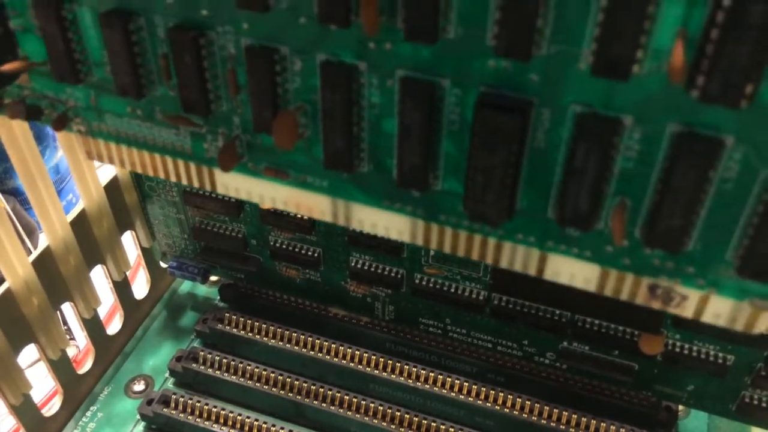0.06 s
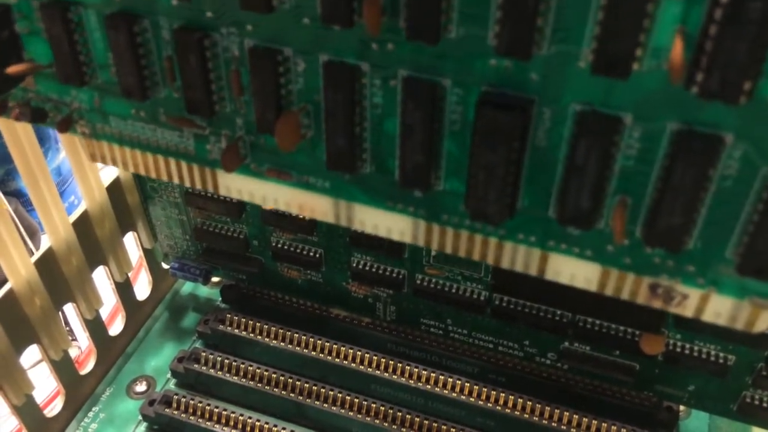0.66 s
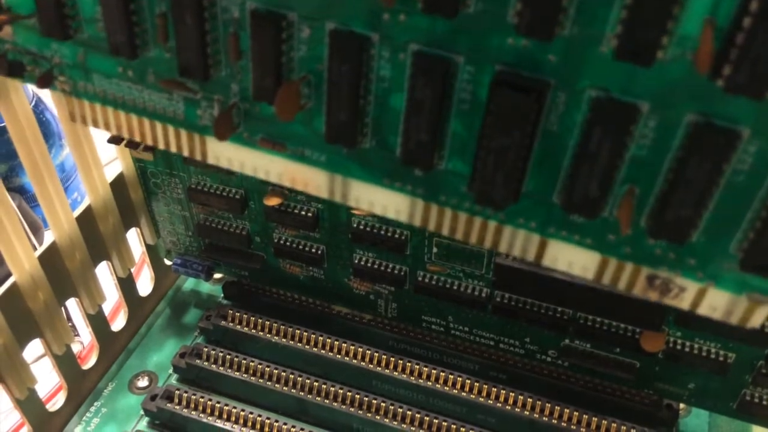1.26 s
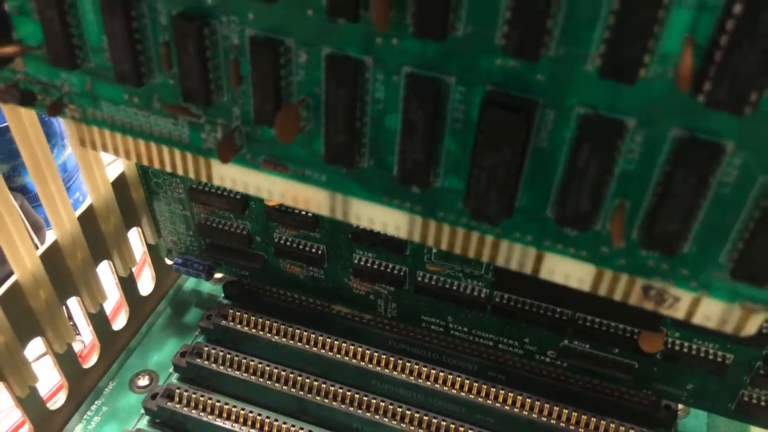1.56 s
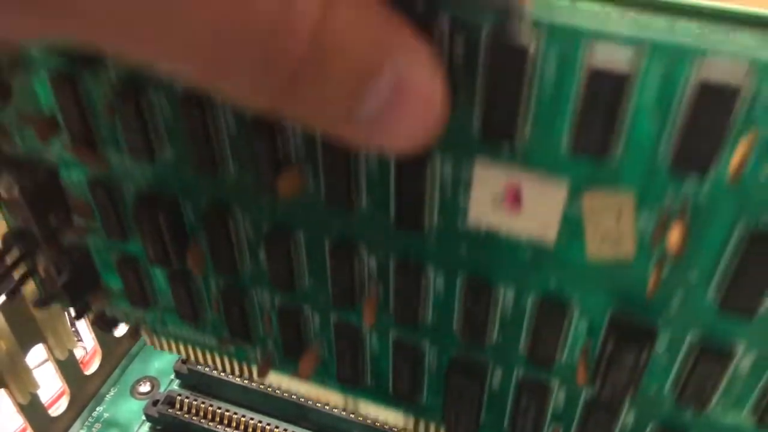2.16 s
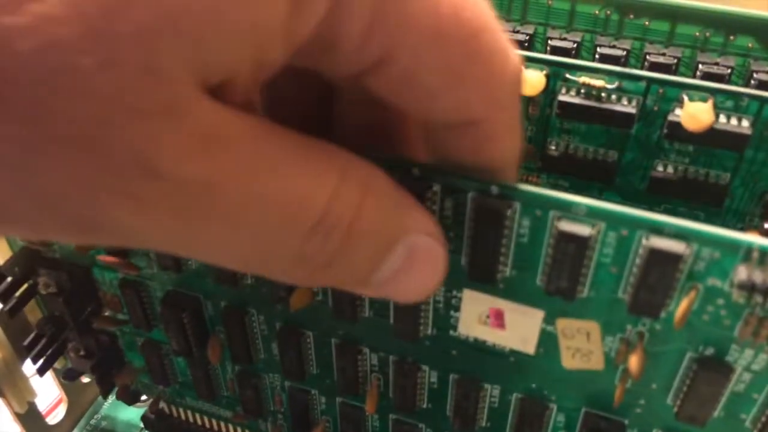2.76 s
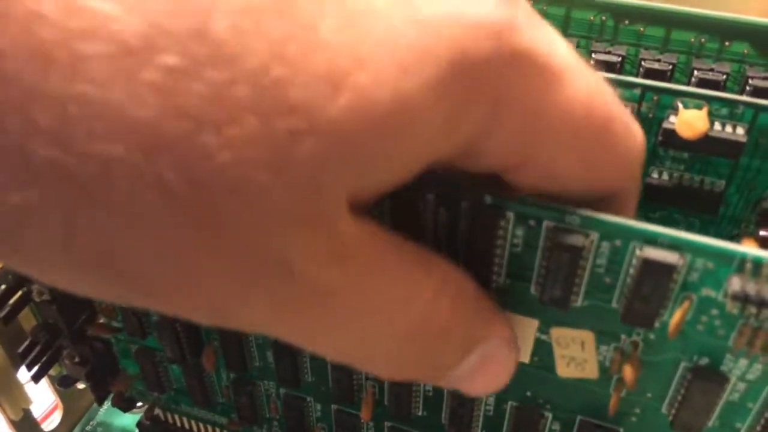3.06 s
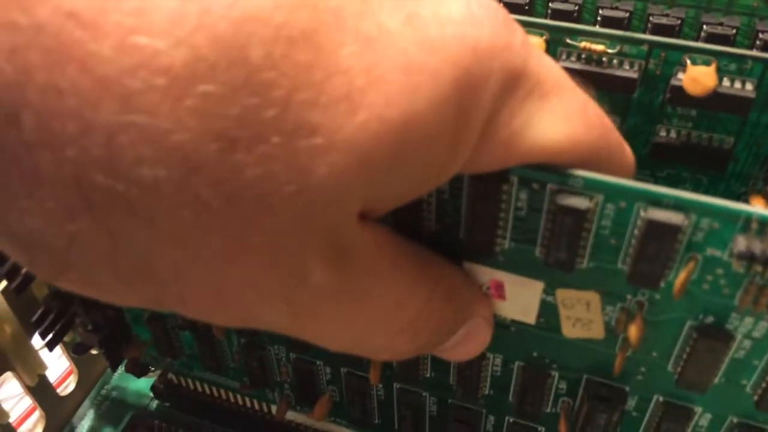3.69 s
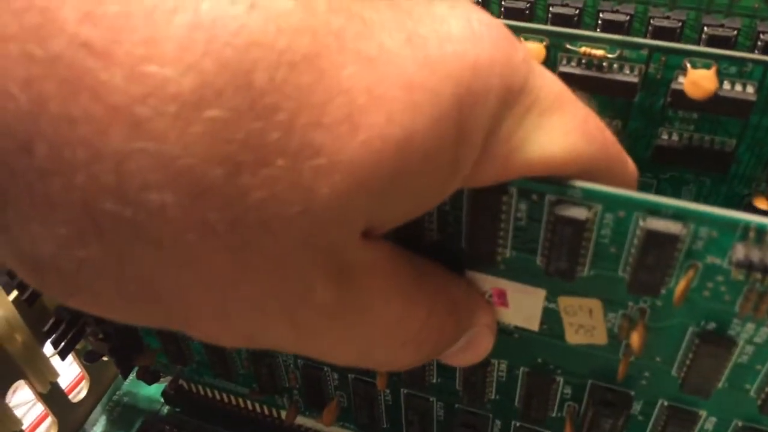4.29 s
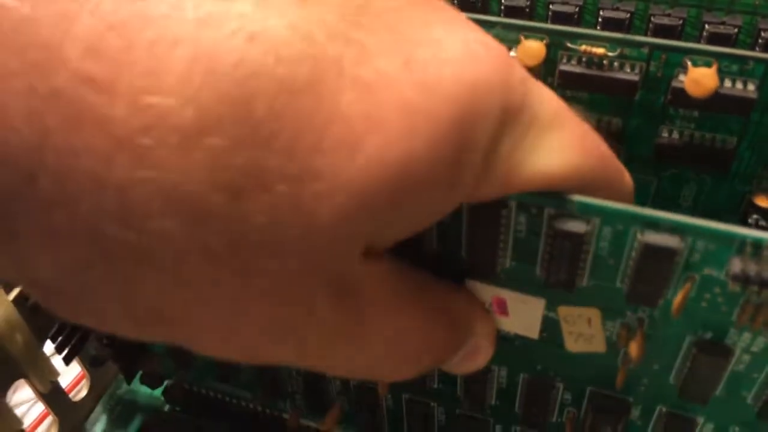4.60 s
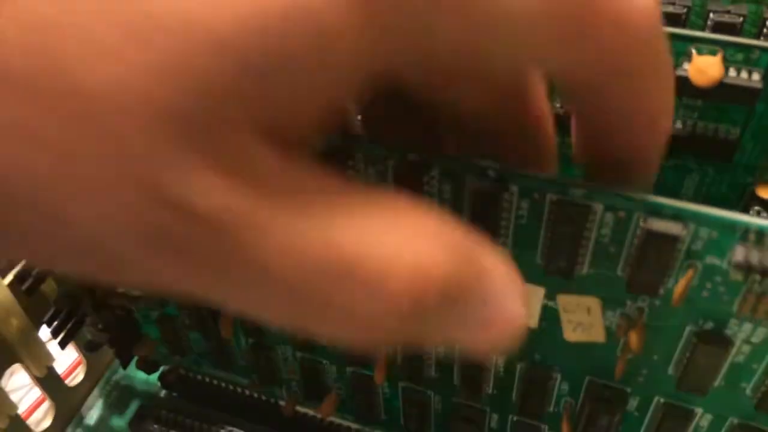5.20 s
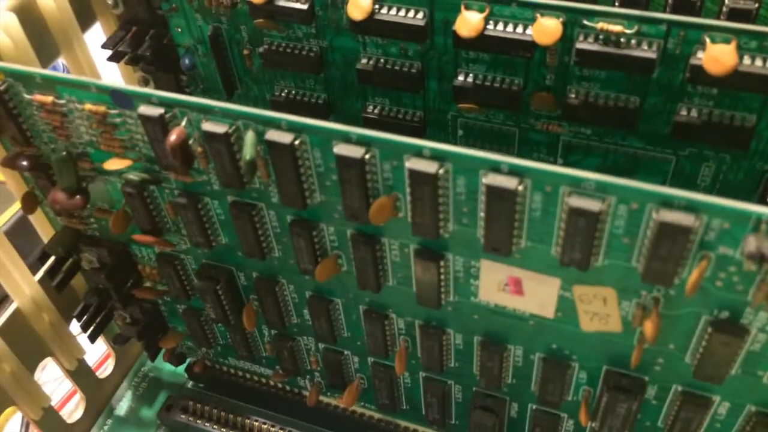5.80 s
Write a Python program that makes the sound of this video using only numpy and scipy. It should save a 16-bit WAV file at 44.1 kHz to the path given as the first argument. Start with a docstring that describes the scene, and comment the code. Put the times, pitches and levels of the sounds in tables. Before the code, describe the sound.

A circuit card is fitted into an open computer, heard close up in a quiet room with a faint, steady hum. Soft finger rubs open the sound, with a light double tap against the case at about 0.4 seconds and a small metallic click at 1.5. From 1.7 seconds the card scrapes softly down its guide, chattering briefly with a falling pitch, and lands on the slot with a distinct knock at about 2.5. Fingers then shift and press, with faint rubbing, a light tap near 3.7 and a few tiny ticks from the contacts. At about 4.5 seconds the card snaps home with one sharp crack, by far the loudest sound, followed by a very short rattle of board and case. A few faint ticks follow. The fingers peel off with a soft brush at 5.2, and a last faint rub comes near 5.9.

```python
"""A circuit card is pushed into its slot in an open computer, close by, in a quiet room with a faint hum.
It taps the case, scrapes and chatters down its guide and lands on the slot. Fingers shift and press,
the contact springs tick, then the edge rasps through them and the card snaps home, ringing board
and chassis. The fingers peel off."""
import sys
import numpy as np
from scipy import signal
from scipy.fft import rfft, irfft, next_fast_len
from scipy.io import wavfile
from scipy.ndimage import uniform_filter1d

SR = 44100
rng = np.random.default_rng(int(sys.argv[2]) if len(sys.argv) > 2 else 0)


def inscribe(sig):
    """Save sig as 16-bit PCM at rate SR to the path in sys.argv[1].

    A 1-D sig is mono; a 2-D sig holds one channel per row.
    Samples are clipped to [-1, 1] before scaling.
    """
    pcm = np.round(np.clip(np.atleast_2d(sig).T, -1, 1) * 32767)
    wavfile.write(sys.argv[1], SR, pcm.astype(np.int16))


N = 262174
TIME_S = np.arange(N) / SR
AGE_S = np.arange(SR // 2) / SR
SEAT_S = 4.548  # card bottoms out

# Mains hum. Each row: frequency in Hz, relative level in dB.
HUM_PARTIALS = [(118.4, -68), (177.6, -66)]
# Edge and finger rubs. Each row: start and length in seconds, level in dB, centre in Hz, width in octaves.
BRIEF_RUBS = [(-.02, .075, -56.5, 1560, 0.68), (0.177, 0.042, -61.5, 3250, 0.75),
              (1.575, 0.085, -65.5, 3750, 1.3), (3.178, 0.057, -64.5, 12500, 0.37),
              (3.236, 0.097, -66, 4530, 1.4), (5.887, 0.067, -58.5, 4550, .87),
              (5.885, 0.045, -57, 675, 0.48)]
# Hand moves. Each row: start and end in seconds, rumble in dB, skin friction in dB.
HAND_MOVES = [(0.103, 0.385, -60, -65.5), (0.854, 1.217, -63, -76), (1.716, 2.352, -65, -69.5),
              (3.4, 3.98, -60.5, -71.5), (4.884, 5.18, -65, -66)]
# Card hits case and slot. Each row: start in seconds, gain in dB, extra thud and click gains in dB.
CARD_KNOCKS = [(0.406, -38.5, -5, -5), (0.434, -44, -3, -2.5), (1.521, -40.5, -11, 6.5),
               (2.544, -23, -13, -35), (2.552, -25, -24, -9.5), (2.581, -35.5, -9.5, -7.5),
               (3.664, -38, -26, -15.5)]
# Springs and small parts. Each row: start in seconds, gain in dB, centre in Hz.
SPRING_TICKS = [(1.2242, -50.5, 3850), (1.9935, -41, 3070), (3.8578, -45.5, 14200), (4.0372, -57.5, 3100),
                (4.3779, -54, 2930), (4.753, -54, 4300), (4.796, -54, 4240), (5.02, -54, 11490),
                (5.4079, -57, 9400)]
# Scrape along the guide. Each row: time in seconds, gain in dB.
SCRAPE_CURVE = [(1.7, -70), (1.83, -58.5), (1.912, -65.5), (1.98, -55), (1.994, -48.5), (2.13, -50),
                (2.142, -46), (2.466, -62), (2.476, -53), (2.5, -61.5), (2.52, -56)]

# Modes. Each row: frequency in Hz, base width in Hz, relative level in dB.
BOARD_MODES = [(56.5, 12, -1.5), (101, 17, -4), (159.5, 17, -2.5), (219, 12, -4), (276, 20, -11.5),
               (454, 14, -0.5), (526, 17, 0.5), (635, 28, -4.5), (760, 45, -5.5), (843, 22, -5.5),
               (941, 22, 0.5), (1055, 16, -4.5), (1200, 22, -7), (1287, 67, -3), (1299, 37, 0),
               (1433, 36, -7.5), (1530, 31, -9), (1726, 30, -6), (1745, 51, -5.5), (1922, 25, -5.5),
               (2314, 47, 1.5), (2460, 35, -15), (3074, 53, -13), (3860, 70, -8.5), (4430, 76, -9),
               (5400, 79, -20.5), (5430, 98, -8.5), (6390, 140, -9.5)]  # seated card and chassis
CARD_MODES = [(189, 21, -23), (505, 24, 2), (780, 22, 4.5), (876, 45, -3), (994, 26, -0.5), (1090, 34, -32),
              (1317, 17, -4.5), (1711, 50, -4), (2090, 130, -10), (2574, 44, -6), (2910, 33, -9)]  # loose card
METAL_MODES = [(1787, 160, -1.5), (3830, 300, -0.5), (4520, 210, 1), (4840, 330, 0), (6130, 140, 0),
               (7100, 190, -4), (11040, 240, -5)]  # bracket and contacts

# Spectra. Each row: frequency in Hz, relative density in dB.
AIR_SPECTRUM = [(25, -35.5), (55, -8.5), (110, -5), (200, -8), (270, -13), (420, -15.5), (750, -16),
                (1270, -13.5), (1550, -23.5), (2500, -27.5), (5000, -32), (15000, -39.5)]
RUMBLE_SPECTRUM = [(25, -29), (60, -2.5), (130, -0.5), (200, -1), (270, -11), (600, -32.5), (2000, -100)]
SKIN_SPECTRUM = [(300, -17), (800, -3), (1400, -8), (2600, -0.5), (4500, -1.5), (6300, -2.5), (9000, -1.5),
                 (12000, -3.5), (16000, -11)]
KNOCK_SPECTRUM = [(30, -3.5), (110, 1), (300, -7), (520, 5), (850, -3), (1150, -3), (1900, 1), (2800, -3.5),
                  (4200, -10), (9000, -26.5)]
THUD_SPECTRUM = [(25, -36), (70, -4), (130, -6), (290, -3.5), (420, -16.5), (1200, -51)]
CLICK_SPECTRUM = [(1650, -15), (2800, -13.5), (4670, 7), (7600, 7), (10100, 0.5), (11000, -9), (13000, 3),
                  (14900, -12), (16000, -41.5)]
DRONE_SPECTRUM = [(65, -43), (110, -9), (168, 1), (209, -9.5), (301, 2), (342, -6.5), (527, -4.5),
                  (643, -26), (785, 0.5), (980, -14), (1180, -9), (1270, -14.5), (1800, -10), (2340, -16),
                  (3960, -120)]
HISS_SPECTRUM = [(820, -13), (1400, -9), (1550, -16.5), (2400, 4.5), (2690, -4), (4660, -3.5),
                 (8590, -10.5), (10900, -11.5), (14900, -17.5), (15500, -28), (16000, -52)]
CRACKLE_SPECTRUM = [(1200, -23), (2500, -2), (6000, -3), (12000, -1), (16000, -6)]
RASP_SPECTRUM = [(120, -38.5), (200, -2.5), (1560, -12.5), (1910, -4), (2910, -8), (3250, -3.5),
                 (4200, -9.5), (5330, -13), (7010, -16.5), (14600, -23.5), (16000, -33)]
CRACK_SPECTRUM = [(60, -33.5), (350, -16.5), (650, -5), (1100, 1), (1900, 0), (2800, -8.5), (4000, -9.5),
                  (6400, -12.5), (8200, -18.5), (15000, -34)]
GRIND_SPECTRUM = [(1500, -21), (3000, -1.5), (4700, 0), (6500, -6), (8500, -14.5), (12500, -23.5),
                  (16000, -31)]
BUZZ_SPECTRUM = [(40, -10), (150, 6.5), (320, 2.5), (500, 1.5), (1300, -5), (2400, -3.5), (3000, -13.5),
                 (5000, -16), (7500, -23), (15000, -34)]

# Spring grind. Each row: time in seconds, level in dB.
GRIND_CURVE = [(4.55, -42), (4.6, -48), (4.655, -57), (4.74, -102), (4.9, -120)]
# Room decay. Each row: frequency in Hz, T60 in seconds.
ROOM_DECAY = [(100, .3), (500, .24), (2000, .22), (6000, .2), (14000, .13)]
# Room tail colour. Each row: frequency in Hz, gain in dB.
ROOM_COLOUR = [(200, 4.5), (1500, 5), (5000, -5.5), (14000, -12.5)]


def amp(db):
    """Decibels to gain."""
    return 10 ** (np.asarray(db) / 20)


def unit(x):
    """Scale to rms 1."""
    return x / np.sqrt(np.mean(x ** 2) + 1e-20)


def burst(x):
    """Scale to the energy of 5 ms at rms 1."""
    return x / np.sqrt(np.sum(x ** 2) / (.005 * SR) + 1e-20)


def along(points, hz):
    """Interpolate on a log frequency axis."""
    points_hz, values = np.transpose(points)
    return np.interp(np.log(hz + 1), np.log(points_hz + 1), values)


def add(track, start_s, x):
    """Mix x into the track."""
    start = round(start_s * SR)
    x = x[max(-start, 0):max(N - start, 0)]
    track[max(start, 0):][:len(x)] += x


def gate(start_s, end_s, rise_s, fall_s):
    """1 from start to end, ramps outside."""
    return np.clip(np.minimum((TIME_S - start_s) / rise_s, (end_s - TIME_S) / fall_s) + 1, 0, 1)


def attack(tau_s):
    """Exponential rise to 1."""
    return 1 - np.exp(-AGE_S / tau_s)


def fade(t60_s):
    """Exponential decay."""
    return np.exp(-np.log(1000) * AGE_S / t60_s)


def filtered(x, response):
    """Apply a gain given as a function of Hz."""
    size = next_fast_len(len(x) + SR // 4)
    return irfft(rfft(x, size) * response(np.fft.rfftfreq(size, 1 / SR)), size)[:len(x)]


def coloured(x, spectrum):
    """Shape x by a spectrum; rms 1."""
    return unit(filtered(x, lambda hz: amp(along(spectrum, hz))))


def band(centre_hz, octaves):
    """Half a second of band noise; rms 1."""
    noise = rng.standard_normal(len(AGE_S))
    return unit(filtered(noise, lambda hz: 1 / (1 + (np.log2((hz + 1) / centre_hz) / octaves) ** 4)))


def smear(t60_s):
    """Click scattered along many paths; flat spectrum."""
    bins = rfft(rng.standard_normal(len(AGE_S)) * fade(t60_s), SR)
    power = np.abs(uniform_filter1d(np.abs(bins) ** 2, size=120))
    return irfft(bins / np.sqrt(power + 1e-12), SR)[:len(AGE_S)]


def grit(per_s, spread_db):
    """Tiny slips, random in time and size."""
    slips = (rng.random(N) < per_s / SR) * rng.standard_normal(N)
    return unit(slips * amp(spread_db * rng.standard_normal(N)))


def wandering(x, depth_db):
    """A moving contact favours new resonances about every 0.1 s."""
    bins = signal.stft(x, nperseg=1024)[2]
    drift = uniform_filter1d(rng.standard_normal(bins.shape), size=3, axis=0)
    drift = uniform_filter1d(drift, size=8, axis=1)
    return unit(signal.istft(bins * amp(depth_db * unit(drift)), nperseg=1024)[1][:N])


def ring(modes, damping, build_cycles):
    """Struck modes; the low ones build up later."""
    hz, width_hz, db = np.transpose(modes)[:, :, None]
    gain = width_hz * amp(db + rng.normal(0, 1, hz.shape))
    envelope = np.exp(-np.pi * damping * width_hz * AGE_S) * attack(build_cycles / hz)
    tones = np.sin(2 * np.pi * (hz * AGE_S + rng.random(hz.shape)))
    return burst(np.sum(gain * envelope * tones, axis=0))


def resonant(x, modes, valley_db):
    """Modes driven by x, with a floor between peaks; rms 1."""
    def response(f):
        power = sum(amp(db) ** 2 / (1 + (2 * (f - hz) / width_hz) ** 2) for hz, width_hz, db in modes)
        return np.sqrt(power + amp(valley_db) ** 2)
    return unit(filtered(x, response))


def background():
    """Room air, mains hum and a rumble that swells with each hand move."""
    air = amp(-64.5) * coloured(rng.standard_normal(N), AIR_SPECTRUM)
    hum = sum(amp(db - 4.5) * np.sqrt(2) * np.sin(2 * np.pi * (hz * TIME_S + rng.random()))
              for hz, db in HUM_PARTIALS)
    moving = sum(amp(db) * gate(start_s, end_s, rise_s=.39, fall_s=.13)
                 for start_s, end_s, db, _ in HAND_MOVES)
    rumble = np.hypot(amp(-74), moving) * coloured(rng.standard_normal(N), RUMBLE_SPECTRUM)
    return air + hum + rumble


def rubs():
    """Edge and fingers rub briefly, roughened by stick-slip."""
    out = np.zeros(N)
    for start_s, length_s, db, hz, octaves in BRIEF_RUBS:
        swell = np.sin(np.pi * np.minimum(AGE_S / length_s, 1))
        catching = amp(2.4 * band(centre_hz=90.5, octaves=5.6))
        add(out, start_s, amp(db) * swell * unit(catching * band(hz, octaves)))
    return out


def skin_friction():
    """Skin creeps over the card and stirs modes damped by the grip."""
    level = sum(amp(db) * gate(start_s, end_s, rise_s=.072, fall_s=.085)
                for start_s, end_s, _, db in HAND_MOVES)
    creep = coloured(wandering(grit(per_s=4700, spread_db=0), depth_db=2.5), SKIN_SPECTRUM)
    damped = [(hz, 2.5 * width_hz, db) for hz, width_hz, db in BOARD_MODES + CARD_MODES]
    return level * resonant(creep, damped, valley_db=-16.5)


def knocks():
    """Each touch rings the loose card, thuds through the case and clicks on metal."""
    out = np.zeros(N)
    for start_s, db, thud_db, click_db in CARD_KNOCKS:
        card = amp(-8) * burst(coloured(smear(t60_s=.057), KNOCK_SPECTRUM))
        card += amp(-8.5) * ring(CARD_MODES, damping=.97, build_cycles=.58)
        thud = amp(1.5) * burst(coloured(smear(t60_s=.1), THUD_SPECTRUM))
        click = amp(-8) * burst(coloured(smear(t60_s=.024), CLICK_SPECTRUM))
        click += amp(-5.5) * ring(METAL_MODES, damping=.37, build_cycles=2.2)
        knock = card + amp(thud_db) * thud + amp(click_db) * click
        add(out, start_s, amp(db) * knock * attack(tau_s=.00052))
    return out


def ticks():
    """Small stiff parts slip and stop; after seating, the springs settle in three weakening slips."""
    out = np.zeros(N)
    delay_s, gap_s, loss_db = .036, .029, 4.5
    settling = [(SEAT_S + delay_s + k * gap_s, -36 - k * loss_db, 4500) for k in range(3)]
    for start_s, db, hz in SPRING_TICKS + settling:
        body = amp(-7.5) * burst(band(centre_hz=hz, octaves=.4) * fade(t60_s=.032))
        edge = amp(-12.5) * burst(band(centre_hz=6500, octaves=1.3) * fade(t60_s=.028))
        add(out, start_s, amp(db) * (body + edge))
    return out


def slide():
    """The edge hisses down the guide; harder scraping raises the board's drone."""
    scrape_db = np.interp(TIME_S, *np.transpose(SCRAPE_CURVE))
    firm_db = -50
    drone_db = -48.5 + 1.28 * (scrape_db - firm_db)
    drone = coloured(wandering(grit(per_s=1500, spread_db=-.5), depth_db=3), DRONE_SPECTRUM)
    hiss = coloured(wandering(grit(per_s=9000, spread_db=-.5), depth_db=3.5), HISS_SPECTRUM)
    touching = gate(1.74, 2.55, rise_s=.14, fall_s=.05)
    return touching * (amp(drone_db) * drone + amp(scrape_db - .5) * hiss)


def chatter():
    """Gripped by the guide, the edge chatters; the pitch sinks as the card goes deeper."""
    start_s, length_s = 1.992, .33
    start_hz, width_hz, sag_octaves_per_s, fade_db_per_s = 1100, 150, 3.8, 27
    age_s = np.clip(TIME_S - start_s, 0, length_s)
    hz = start_hz * 2 ** (-sag_octaves_per_s * age_s)
    flutter = unit(filtered(rng.standard_normal(N), lambda f: 1 / (1 + (f / width_hz) ** 2)))
    tone = unit(flutter * np.sin(2 * np.pi * np.cumsum(hz) / SR))
    gripped = gate(start_s, start_s + length_s, rise_s=.004, fall_s=.016)
    return amp(-49.5 - fade_db_per_s * age_s) * gripped * tone


def strain():
    """Under growing pressure the edge crackles faintly against the springs."""
    pressure = gate(3.5, 4.29, rise_s=.45, fall_s=.4)
    crackle = coloured(grit(per_s=61, spread_db=3), CRACKLE_SPECTRUM)
    return amp(-79.5) * pressure * unit(signal.fftconvolve(crackle, smear(t60_s=.02))[:N])


def seating():
    """The edge rasps through the springs and hits the slot bottom, jolting board and case."""
    from_peak_s = np.abs(TIME_S - (SEAT_S - .0055))
    speed = np.exp(-from_peak_s / .004) + amp(-26) * np.exp(-from_peak_s / .011)
    out = amp(-21) * speed * coloured(grit(per_s=44000, spread_db=2.5), RASP_SPECTRUM)
    crack = burst(coloured(smear(t60_s=.016), CRACK_SPECTRUM) * attack(tau_s=.0014))
    board = ring(BOARD_MODES, damping=1.1, build_cycles=1.3)
    case_thump = burst(np.sin(2 * np.pi * 57.8 * AGE_S) * fade(t60_s=.16))  # rocks on its feet
    add(out, SEAT_S, amp(-17) * crack + amp(-14) * board + amp(-34.5) * case_thump)
    board_rebound = burst(band(centre_hz=604, octaves=1.3) * fade(t60_s=.046))
    add(out, SEAT_S + .02, amp(-32.5) * board_rebound)
    loose_parts = coloured(grit(per_s=9900, spread_db=1.5), BUZZ_SPECTRUM)
    buzz = resonant(loose_parts, BOARD_MODES, valley_db=-8)[:len(AGE_S)]
    add(out, SEAT_S + .012, amp(-30.5) * buzz * fade(t60_s=.31))
    return out


def grind():
    """The springs grind until the card rests."""
    level_db = np.interp(TIME_S, *np.transpose(GRIND_CURVE), left=-120)
    return amp(level_db) * coloured(grit(per_s=12000, spread_db=-2), GRIND_SPECTRUM)


def release():
    """Fingers peel off: soft thud, dull brush, sticky hiss."""
    thud = burst(band(centre_hz=108, octaves=.75) * fade(t60_s=.1))
    brush = burst(band(centre_hz=1166, octaves=1.05) * fade(t60_s=.109) * attack(tau_s=.008))
    peel = burst(band(centre_hz=5000, octaves=1.5) * fade(t60_s=.058) * attack(tau_s=.003))
    out = np.zeros(N)
    add(out, 5.228, amp(-44.5) * thud + amp(-47.5) * brush + amp(-52.5) * peel)
    return out


def room(x):
    """Small-room tail after a short gap; treble dies first."""
    hz, age_s, bins = signal.stft(rng.standard_normal(len(AGE_S)), SR, nperseg=128)
    decay = np.exp(-np.log(1000) * age_s / along(ROOM_DECAY, hz)[:, None])
    tail = signal.istft(bins * decay, SR, nperseg=128)[1][:len(AGE_S)]
    tail *= np.clip((AGE_S - .006) / .012, 0, 1)
    tail = filtered(tail / np.linalg.norm(tail), lambda f: amp(along(ROOM_COLOUR, f)))
    return signal.fftconvolve(x, tail)[:N]


def scene():
    """Mono mix: close sources, room tail, background."""
    near = rubs() + skin_friction() + knocks() + ticks() + slide() + chatter()
    near += strain() + seating() + grind() + release()
    return (near + amp(-20) * room(near) + background())[None]


def record(dry):
    """Brick-wall low-pass."""
    return np.array([filtered(x, lambda hz: hz < 15600) for x in dry])


dry = scene()
out = record(dry)
inscribe(out)
```